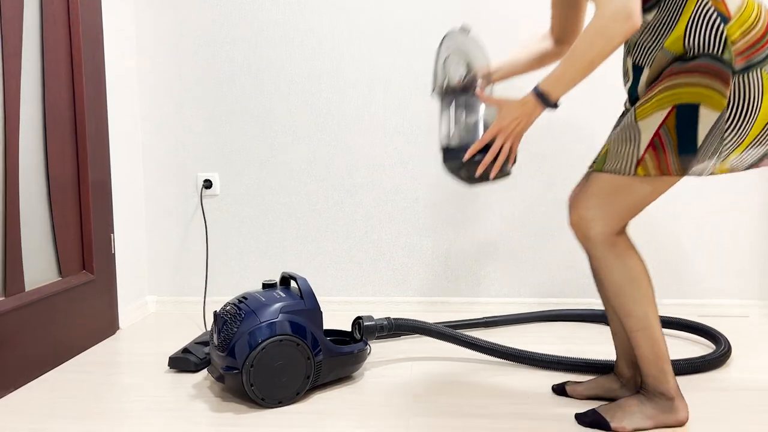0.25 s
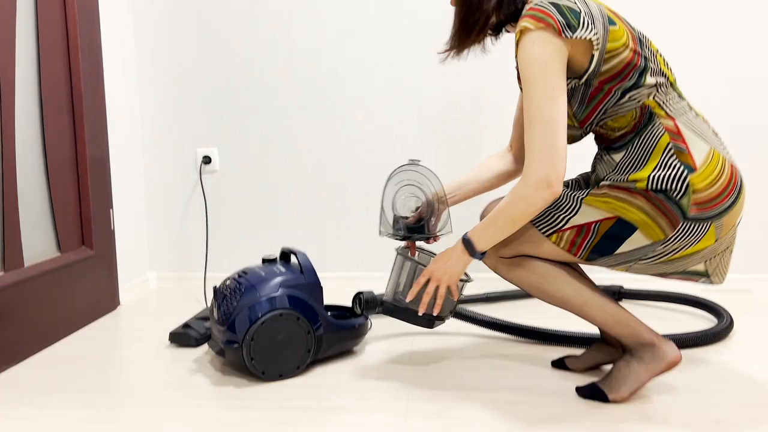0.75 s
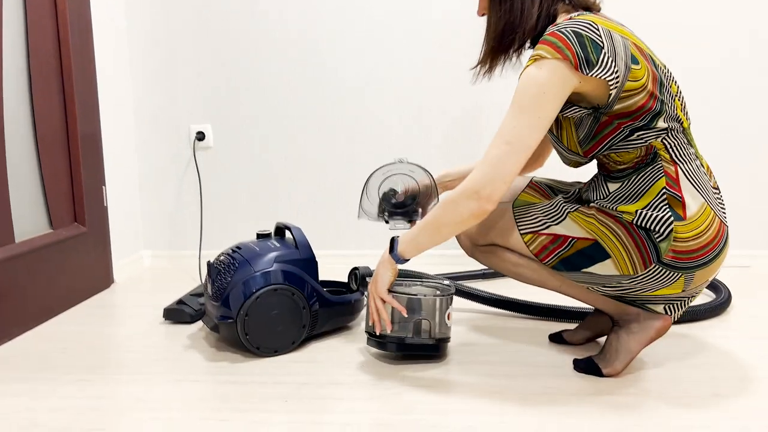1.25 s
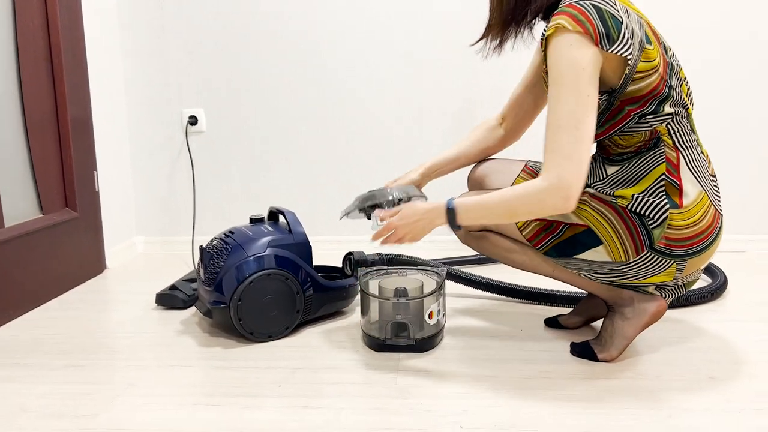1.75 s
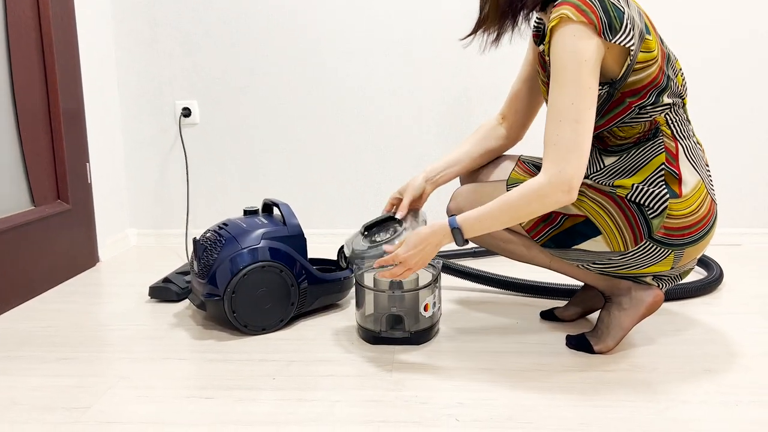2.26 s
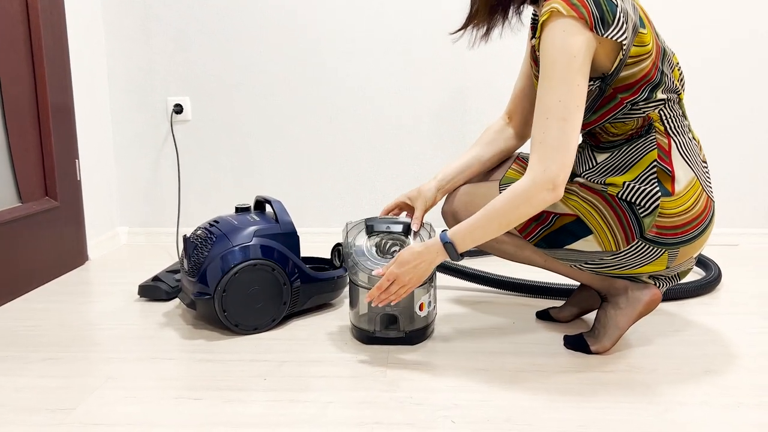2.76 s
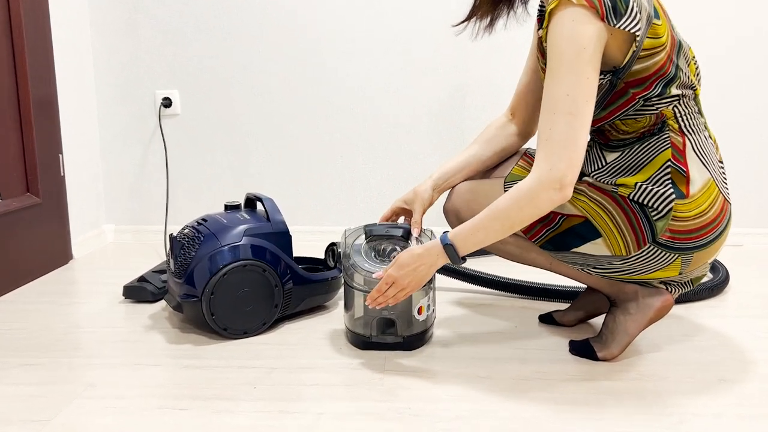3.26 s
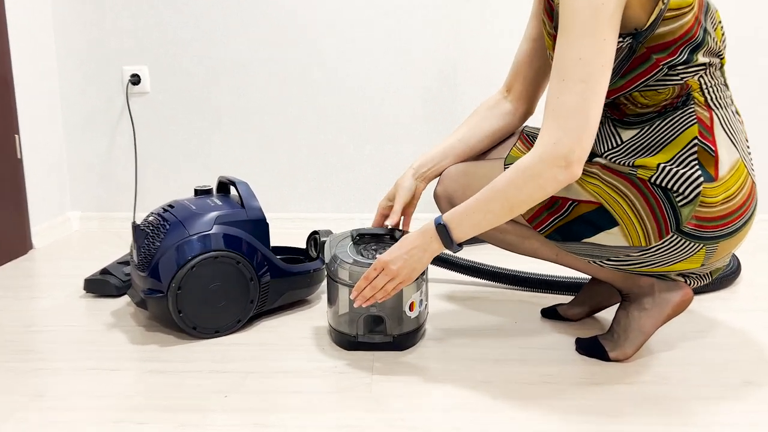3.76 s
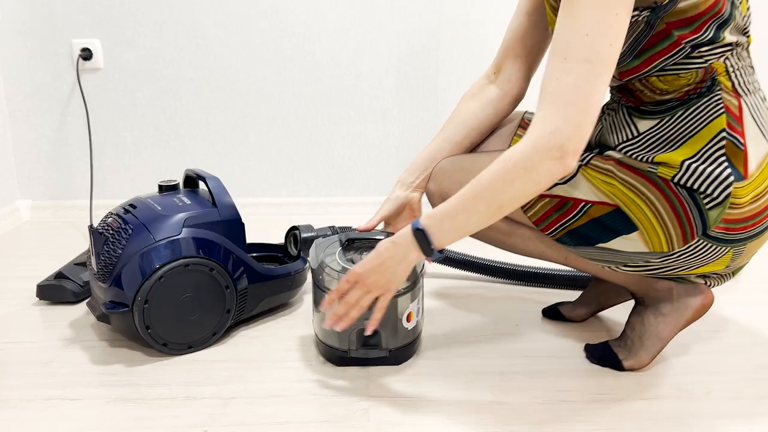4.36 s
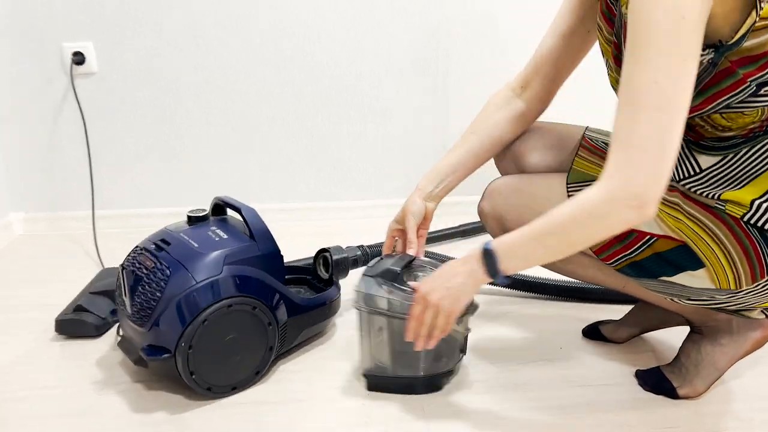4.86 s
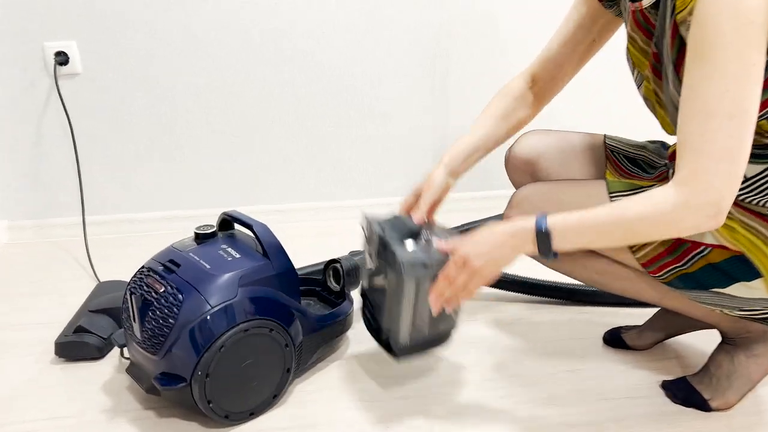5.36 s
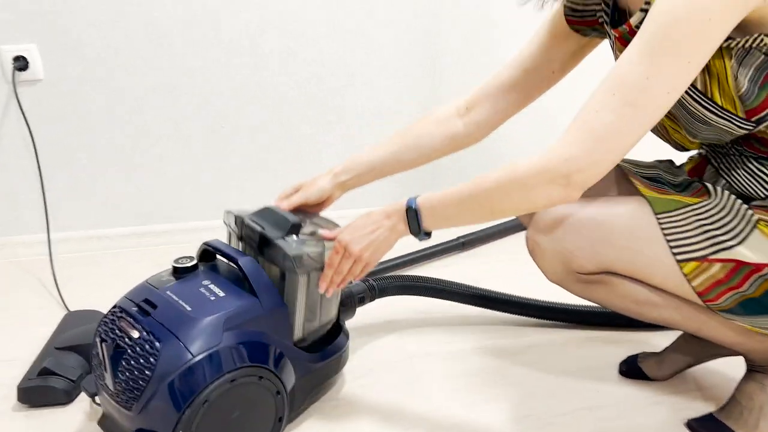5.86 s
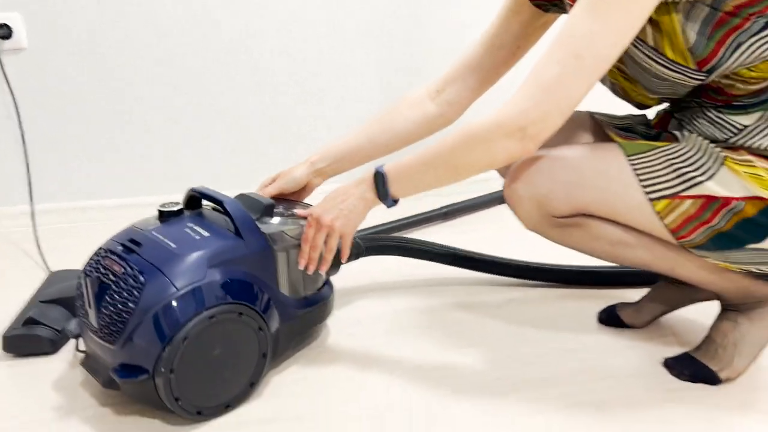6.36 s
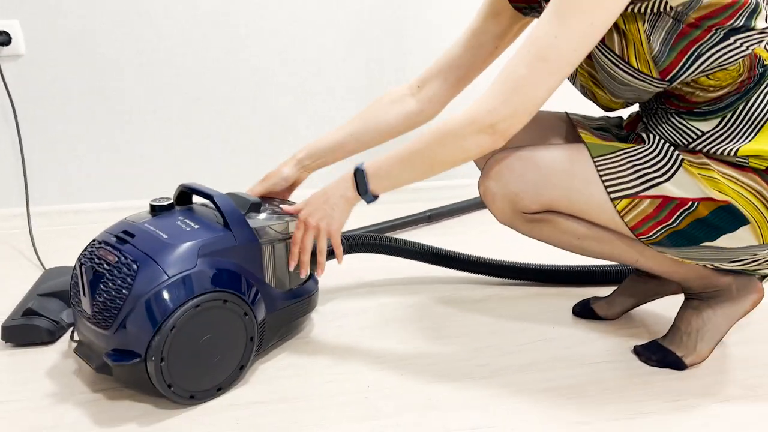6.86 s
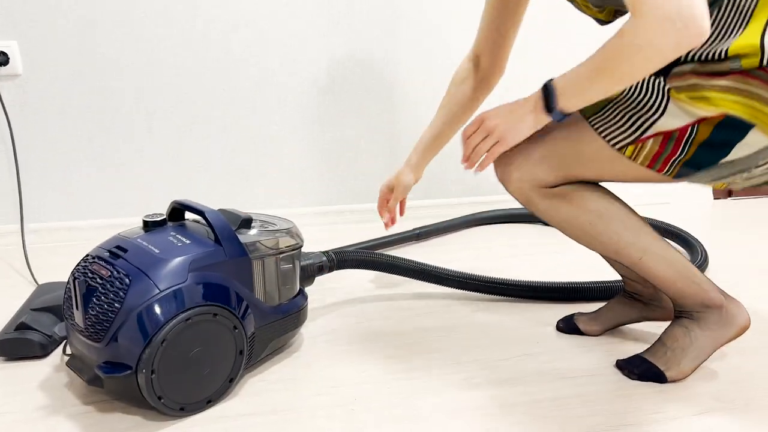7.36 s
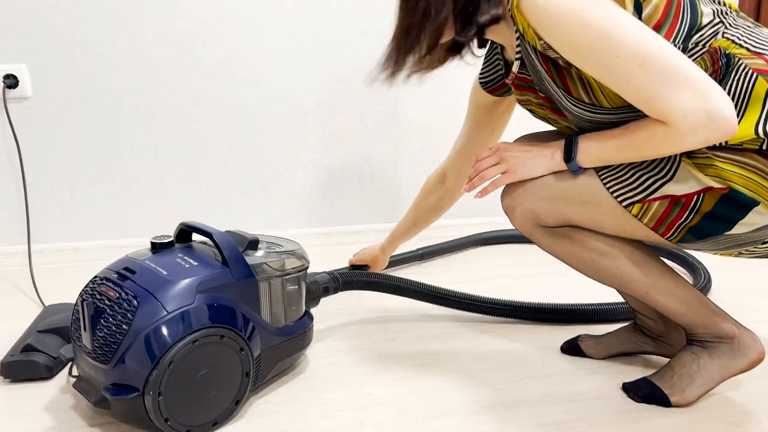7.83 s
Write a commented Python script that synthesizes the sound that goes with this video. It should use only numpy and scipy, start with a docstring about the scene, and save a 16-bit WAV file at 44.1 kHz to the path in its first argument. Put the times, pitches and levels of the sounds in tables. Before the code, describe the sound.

A plastic vacuum dust bin clacks, lands, and is clunked shut, then bumps and snaps into its housing in a bare, echoing room.

```python
"""Dull taps and a rustle of hands open the scene: a plastic dust bin is handled in a bare, quiet room.
Filter and lid clack and click into place, the bin lands on a laminate floor, and the lid is scraped and shut.
The bin rocks, bumps and slides into the vacuum cleaner and latches; the ribbed hose is picked up and dragged.
Contacts are short forces that ring plastic modes over a damped thud; rubbing is a coloured stream of tiny slips.
Both are heard straight and through the echoes of the room, over still air."""
import sys
import numpy as np
from scipy import signal
from scipy.fft import rfft, irfft, next_fast_len
from scipy.io import wavfile

SR = 44100
rng = np.random.default_rng(int(sys.argv[2]) if len(sys.argv) > 2 else 0)


def put_to_file(sound):
    """Save the sound as 16-bit audio at rate SR, in the file named by the first command-line argument."""
    columns = np.atleast_2d(sound).T  # one column per channel
    safe = np.clip(columns, -1, 1)
    whole_steps = np.round(safe * 32767)
    wavfile.write(sys.argv[1], SR, whole_steps.astype(np.int16))


N = 356945
TIME = np.arange(N) / SR   # seconds

# Wall modes of the bin. Each row: frequency in Hz, level in dB over the bare contact before ring_db, t60 in s.
BIN_WALL_MODES = [(564, 2, .08), (710, -2.5, .08), (908, 4, 0.074), (1106, 3.5, 0.049), (1506, 15, 0.053),
                  (1627, 15, 0.078), (1728, 13, 0.019), (1878, 5.5, 0.037), (2080, -1.5, 0.24),
                  (2437, 0, .06), (2758, 10.5, 0.17), (3240, 1, 0.011), (4020, 2.5, 0.035),
                  (4930, -3.5, 0.069), (6600, 7.5, 0.026)]
# Modes of the housing with the bin in it. Each row: frequency in Hz, level in dB as above, t60 in seconds.
HOUSING_MODES = [(548, 7, 0.036), (800, 7.4, 0.011), (1128, 3.2, 0.11), (1530, 6.2, 0.14),
                 (1700, 13, 0.058), (1862, 10, 0.039), (2498, 2.4, 0.044), (3460, 4.8, .03),
                 (3984, 4, 0.024), (4865, 3.5, 0.075), (6830, 5.8, 0.027)]
# How the microphone pair leans. Each row: frequency in Hz, left minus right in dB.
STEREO_LEAN = [(80, -2), (130, -4.5), (200, -1.5), (350, 2), (700, 5.5), (1100, 2), (1500, 0), (2500, 3),
               (4500, 4), (8000, -1), (15000, 0)]


def from_db(db):
    """Gain for a level in dB."""
    return 10 ** (np.asarray(db) / 20)


def at_hz(points, hz):
    """Read a table of (Hz, value) on a log-frequency axis."""
    f, value = np.transpose(points)
    return np.interp(np.log(np.maximum(hz, 1)), np.log(f), value)


def pan(db):
    """Left and right gains of constant power; positive dB leans left."""
    g = from_db(np.array([[1], [-1]]) * db / 2)
    return g / np.sqrt(np.mean(g ** 2, axis=0))


def add(track, s, sound):
    """Mix a sound in at a time in seconds."""
    start = max(0, round(s * SR))
    track[..., start:start + sound.shape[-1]] += sound[..., :N - start]


def at_level(x, db):
    """Give a short sound the energy of 50 ms at this level."""
    energy = np.sum(x ** 2, axis=-1, keepdims=True)
    return x * from_db(db) * np.sqrt(SR / 20 / energy)


def band_pass(edges, order):
    """Sections of a causal band-pass."""
    return signal.butter(order, edges, "band", fs=SR, output="sos")


def resonate(x, hz, t60):
    """One damped resonance with a gain of about 1 at its peak."""
    r = 1000 ** (-1 / (t60 * SR))   # decay per sample
    b = np.array([1, 0, -1]) * (1 - r * r) / 2
    a = [1, -2 * r * np.cos(2 * np.pi * hz / SR), r * r]
    return signal.lfilter(b, a, x + 1e-18)   # the tiny offset avoids slow denormal numbers


def coloured(x, colour):
    """Give noise a spectrum in dB per Hz; rms 1."""
    size = next_fast_len(N)
    gain = from_db(at_hz(colour, np.fft.rfftfreq(size, 1 / SR)))
    y = irfft(rfft(x, size) * gain, size)[..., :N]
    return y / np.sqrt(np.mean(y ** 2))


def diffuse_spectrum(size):
    """Spectrum of white noise from all sides as the two microphones pick it up."""
    # Each row: frequency in Hz, left-right likeness (clipped to -1..1 after interpolation).
    stereo_likeness = [(80, 0.069), (300, .88), (480, 0.058), (700, 0.059), (1400, 0.17), (2300, .7),
                       (4800, 0.11), (7500, 0.88), (9300, -1.1), (10500, -2), (11500, 1), (15000, 0.8)]
    hz = np.fft.rfftfreq(size, 1 / SR)
    mid, side = rfft(rng.standard_normal((2, size)))
    alike = np.clip(at_hz(stereo_likeness, hz), -1, 1)
    pair = np.sqrt((1 + alike) / 2) * mid + np.sqrt((1 - alike) / 2) * side * [[1], [-1]]
    return pair * pan(at_hz(STEREO_LEAN, hz))


def diffuse_noise(size):
    """White noise from all sides as a stereo sound."""
    return irfft(diffuse_spectrum(size), size)


def near_path(x, bounce_db=-6, bounce_s=0.0039):
    """Straight sound with the lean of the pair, and quick bounces off floor and wall."""
    size, lead = 2048, 24   # samples; the lead leaves space for the lean filter to start early
    lean = irfft(pan(at_hz(STEREO_LEAN, np.fft.rfftfreq(size, 1 / SR))), size)
    dying = np.exp(-np.arange(size) / SR / bounce_s) * np.sqrt(2 / (bounce_s * SR))
    bounces = diffuse_noise(size) * dying
    path = np.roll(lean, lead, axis=1) + from_db(bounce_db) * np.roll(bounces, 2 * lead, axis=1)
    path = path[:, :size // 2] / np.sqrt(1 + from_db(bounce_db) ** 2)
    return signal.oaconvolve(x[None], path, axes=1)[:, lead:len(x) + lead]


def room_fade(size=24000, gap_s=0.0066, build_s=0.00057):
    """Bare walls: how echoes build up and die in each range, and each range's share of the spectrum."""
    # Decay of the room. Each row: centre of the range in Hz, t60 in seconds.
    room_decay = [(100, 0.53), (300, 0.4249), (800, 0.4137), (1800, 0.4539), (4500, 0.4), (8000, 0.42),
                  (14000, 0.46)]
    t, hz = TIME[:size], np.fft.rfftfreq(size, 1 / SR)
    centres, t60 = np.transpose(room_decay)
    build_up = 1 - np.exp(-np.maximum(t - gap_s, 0) / build_s)
    fade = 1000 ** (-t / t60[:, None]) * build_up
    shares = np.array([at_hz(list(zip(centres, own)), hz) for own in np.eye(len(centres))])
    return fade / np.sqrt(np.sum(fade ** 2, axis=1, keepdims=True)), shares


def echoes(magnitude, fade, shares):
    """Dense stereo echoes of a sound with this spectrum; every call draws a pattern of its own."""
    size = fade.shape[1]
    noise = (diffuse_spectrum(size) * magnitude).astype(np.complex64)
    ranges = zip(shares.astype(np.float32), fade.astype(np.float32))
    return sum(irfft(noise * share, size) * dying for share, dying in ranges)


def chatter(chatter_s, size, touches_per_s=7000, first_touch=0.44, bite_s=0.00033):
    """Force of one contact: a first touch, then loose edges buzzing to rest."""
    t = TIME[:size]
    pressure = np.exp(-t / chatter_s) * (1 - np.exp(-t / bite_s))
    touches = rng.random(size) < touches_per_s / SR
    force = rng.standard_normal(size) * touches * pressure
    force[0] = first_touch
    return force


def swing(hz, swell_s, size):
    """A heavy, well damped body swings up and settles within a few cycles."""
    t = TIME[:size]
    return t * np.exp(-t / swell_s) * np.sin(2 * np.pi * hz * t)


def contacts(table, modes, registers_db, chatter_s, thud_hz, swell_s, floor_db, room_db, soft_hz, ring_db,
             lean_db, floor_hz=86, floor_swell_s=0.0068, low_room_db=-0.5, bump_db=-3, size=20480):
    """Stereo contacts: each rings the walls, thuds the hollow body and shakes the floor."""
    # Where knock, clack, snap and tick lie. Each row: low edge in Hz, high edge in Hz.
    register_edges = [(400, 1200), (1200, 2300), (2300, 5200), (5200, 15500)]
    # Low standing waves. Each row: frequency in Hz, level in dB over thud and boom, t60 in seconds,
    # left minus right in dB before lean_db.
    standing_waves = [(92, 5, 0.34, 1), (118, 6.5, 0.15, -2.5), (165.2, 5.5, 0.24, 11.5),
                      (216.6, 0.5, 0.2, 9), (334, 3.5, .35, 9)]
    direct, lows, tails = np.zeros(N), np.zeros(N), np.zeros((2, N))
    fade, shares = room_fade(size)
    give = np.exp(-2 * np.pi * soft_hz / SR)   # plastic yields, which rounds off the force
    short = size // 4
    octaves = np.log2(register_edges).mean(axis=1)
    registers = [band_pass(edges, order=4) for edges in register_edges]
    blow = band_pass([115, 430], order=3)
    for s, clatter_db, brightness_db, thud_db, direct_db in table:
        # the direct sound carries the chatter, the room only the colour of a plain knock
        pushes = [chatter(chatter_s, short), signal.unit_impulse(short) + 1e-18]
        force = signal.lfilter([1], [1, -give], pushes)
        ringing = sum(from_db(db + ring_db) * resonate(force, hz, t60) for hz, db, t60 in modes)
        walls = force + ringing
        # the parts that meet set the weight of each register; brightness tilts it around the clack
        weights_db = clatter_db + np.array(registers_db) + brightness_db * (octaves - octaves[1])
        layers = [at_level(signal.sosfilt(sos, walls), db) for sos, db in zip(registers, weights_db)]
        clatter, knock = sum(layers)
        thud = at_level(swing(thud_hz, swell_s, short), thud_db)
        boom = at_level(swing(floor_hz, floor_swell_s, short), thud_db + floor_db)
        # the blow itself is broader than the swing
        bump = at_level(signal.sosfilt(blow, force[1]), thud_db + bump_db)
        room_parts = (knock, bump, from_db(low_room_db) * (thud + boom))
        power = sum(np.abs(rfft(part, size)) ** 2 for part in room_parts)
        room_share = 1 / np.sqrt(1 + from_db(direct_db) ** 2)
        add(direct, s, (clatter + thud + boom + bump) * room_share * from_db(direct_db))
        add(tails, s, echoes(np.sqrt(power), fade, shares) * room_share * from_db(room_db))
        add(lows, s, thud + boom)
    first_s, last_s = table[0][0], table[-1][0]
    sounding = slice(max(0, round(first_s * SR)), round(last_s * SR) + SR)
    standing = sum(pan(pan_db) * from_db(db) * resonate(lows[sounding], hz, t60)
                   for hz, db, t60, pan_db in standing_waves)
    add(tails, first_s, near_path(direct[sounding]) + standing)
    return tails * pan(lean_db)


def strokes(rows, rise_db_per_s, fall_db_per_s, rest_db=-120):
    """Gain of a rubbing movement: each stroke swells, holds and dies away to the level at rest."""
    t = TIME[::32]   # a coarse grid is enough for a slow gain
    levels = [rest_db + 0 * t]
    for s, hold_s, db in rows:
        rise = rise_db_per_s * np.maximum(s - t, 0)
        fall = fall_db_per_s * np.maximum(t - s - hold_s, 0)
        levels.append(db - rise - fall)
    return np.interp(TIME, t, from_db(np.max(levels, axis=0)))


def friction(gain, colour, slips_per_s, uneven_db):
    """Rubbing is a stream of tiny slips of uneven size."""
    happens = rng.random(N) < slips_per_s / SR
    direction = rng.choice([-1, 1], N)
    strength = from_db(uneven_db * np.clip(rng.standard_normal(N), -2, 2))
    return coloured(happens * direction * strength, colour) * gain


def still_air():
    """The quiet room: steady diffuse noise with a fixed spectrum."""
    # Each row: frequency in Hz, level in dB per Hz (relative).
    air_colour = [(25, 4), (77, 6.5), (200, -2), (330, 3), (620, -4), (1100, 5.5), (2000, -9.5),
                  (4000, -23), (8000, -25.5), (15000, -29)]
    return from_db(-68) * coloured(diffuse_noise(next_fast_len(N)), air_colour)


def rustle():
    """Hands and clothes: dense slips swell with each movement over a faint rest level."""
    # Each row: start in seconds, hold in seconds, level in dB before the mix.
    movements = [(0.0, 0.013, -58), (0.34, 0.3, -65.5), (0.55, 0.12, -63.5), (0.78, 0.41, -73),
                 (1.93, 0.0092, -65.5), (2.15, 0.051, -61.5), (2.35, 0.13, -64.5), (3.87, 0.59, -58.5),
                 (4.88, 0.076, -55), (5.2, 0.086, -59.5), (5.49, 0.0067, -62.5), (5.75, 0.0067, -54.5),
                 (6.83, 0.016, -65), (7.1, 0.12, -72), (7.53, 0.047, -71.5), (7.95, 0.14, -59)]
    # Each row: frequency in Hz, level in dB per Hz (relative).
    rustle_colour = [(60, -7.5), (300, 1), (800, 0), (1800, -1.5), (4500, -7), (8500, -17.5), (13000, -16),
                     (15500, -11)]
    gain = strokes(movements, rise_db_per_s=202.5, fall_db_per_s=111.5, rest_db=-79)
    return friction(gain, rustle_colour, slips_per_s=3600, uneven_db=4.0)


def dull_taps():
    """Fingers and loose parts tap the bin, with little treble and a short thud."""
    # Each row: start in seconds, clatter in dB before registers_db, brightness in dB per octave,
    # thud in dB, direct over room in dB before room_db.
    tap_rows = [(0.003, -47.5, -3, -50.5, -5), (0.1, -55, -2, -58, -18), (0.164, -51.5, 6, -64, -16),
                (0.405, -57.5, 1.5, -76, -1), (0.804, -59, 2, -97, -15), (2.708, -50.5, -0.5, -53, -5.5),
                (2.992, -57.5, -1.5, -67, -13), (3.022, -71, -7, -60.5, -3),
                (3.185, -59.5, -1.5, -60, -6.5), (3.211, -52.5, -1.5, -59, -2.5),
                (3.58, -42, -1, -58, -5.5), (3.688, -36, -1, -47, -8.5), (3.995, -49.5, 1, -60.5, -9)]
    return contacts(tap_rows, BIN_WALL_MODES, registers_db=[-4.5, -8.4, -15.4, -30.5], ring_db=-4,
                    chatter_s=0.0046, thud_hz=341, swell_s=0.0031, bump_db=-3.5, floor_db=-9.5,
                    room_db=1, low_room_db=-1.5, soft_hz=1800, lean_db=1)


def tab_clicks():
    """The lid's tabs click thinly, the snap register strong against the clack."""
    # Each row: start in seconds, clatter in dB before registers_db, brightness in dB per octave,
    # thud in dB, direct over room in dB before room_db.
    click_rows = [(0.261, -68.5, 6.5, -72, 1), (0.867, -76, 6, -85.5, 0), (1.28, -36, 2.3, -43.5, -9),
                  (2.033, -51, 3.5, -66, -8), (2.1, -55.5, 3, -71, -2), (2.203, -57.5, 2, -89, 2),
                  (2.369, -60.5, 6, -81, 2.5), (2.541, -51.5, 5.5, -69, -2)]
    return contacts(click_rows, BIN_WALL_MODES, registers_db=[-4.5, -8.5, -6, -15.0], ring_db=-6.5,
                    chatter_s=0.003, thud_hz=332, swell_s=0.0035, floor_db=-12.5,
                    room_db=1.5, soft_hz=1800, lean_db=0.5)


def rim_clacks():
    """Filter and lid clack hard on the rim and ring the bin walls."""
    # Each row: start in seconds, clatter in dB before registers_db, brightness in dB per octave,
    # thud in dB, direct over room in dB before room_db.
    clack_rows = [(1.043, -46, 3.5, -58.5, -10.5), (1.132, -29, -0.5, -48.5, 0),
                  (3.736, -45.5, 3.5, -57, -1), (3.846, -44.5, 0, -56, -1.5), (5.262, -58.5, 3, -64.5, 6)]
    return contacts(clack_rows, BIN_WALL_MODES, registers_db=[-6.0, -5.0, -5.0, -21.5], ring_db=-1.5,
                    chatter_s=0.0031, thud_hz=240, swell_s=0.004, floor_db=-1.0,
                    room_db=1, soft_hz=1800, lean_db=1)


def weight_shifts():
    """Weight shifts on the floor boards: sparse, uneven slips with a deep spectrum."""
    # Each row: start in seconds, hold in seconds, level in dB before the mix.
    shift_rows = [(1.12, 0.52, -49.5), (4.1, 0.41, -66), (4.79, 0.036, -44), (6.13, 0.04, -55),
                  (6.59, 0.02, -57.5)]
    # Each row: frequency in Hz, level in dB per Hz (relative).
    board_colour = [(10, -26), (25, -12), (42, -9.5), (62, -4), (90, -9.5), (200, -23), (1000, -65),
                    (8000, -91)]
    gain = strokes(shift_rows, rise_db_per_s=191, fall_db_per_s=60, rest_db=-79.5)
    return friction(gain, board_colour, slips_per_s=290, uneven_db=7.5)


def base_landings():
    """The open bin lands softly on the floor, its walls ringing little."""
    # Each row: start in seconds, clatter in dB before registers_db, brightness in dB per octave,
    # thud in dB, direct over room in dB before room_db.
    landing_rows = [(1.491, -36.5, 0.5, -40, -2.5), (1.546, -48.5, -7.5, -46, -4), (1.602, -57, 4, -38, -3),
                    (1.715, -60, -1, -56.5, -6)]
    return contacts(landing_rows, BIN_WALL_MODES, registers_db=[-4.5, -19.5, -16.5, -30.5], ring_db=-13,
                    chatter_s=0.0021, thud_hz=290, swell_s=0.0016, floor_db=-2,
                    room_db=-1, soft_hz=1800, lean_db=1.0)


def lid_scrape():
    """The lid's edge sticks and slips on the rim while it is lined up."""
    # Each row: start in seconds, hold in seconds, level in dB before the mix.
    scrape_rows = [(2.05, 0.19, -60.5), (2.56, 0.14, -68)]
    # Each row: frequency in Hz, level in dB per Hz (relative).
    scrape_colour = [(300, -20.5), (570, 11), (900, -13), (1900, 4.5), (3200, -6.5), (4200, -7), (5100, 1),
                     (6200, -19), (15000, -34.5)]
    gain = strokes(scrape_rows, rise_db_per_s=600, fall_db_per_s=198)
    return friction(gain, scrape_colour, slips_per_s=1400, uneven_db=6.5)


def lid_shut():
    """The lid is pressed shut with one heavy clunk."""
    # Each row: start in seconds, clatter in dB before registers_db, brightness in dB per octave,
    # thud in dB, direct over room in dB before room_db.
    shut_rows = [(4.045, -22.5, 0, -23, 3)]
    return contacts(shut_rows, BIN_WALL_MODES, registers_db=[-7.5, -5.5, -14.0, -24.0], ring_db=0.5,
                    chatter_s=0.0049, thud_hz=215, swell_s=0.0057, bump_db=-1, floor_db=-15,
                    room_db=3.5, low_room_db=-1.5, soft_hz=1800, lean_db=1.0)


def base_rocks():
    """The closed bin rocks on its base with a deeper thud and a rattle of the lid."""
    # Each row: start in seconds, clatter in dB before registers_db, brightness in dB per octave,
    # thud in dB, direct over room in dB before room_db.
    rock_rows = [(4.352, -36, 1, -45.5, -13.5), (4.376, -40, -4.5, -31.5, 4.5), (4.589, -41, 0, -47, -4),
                 (4.599, -32.5, 1, -48.5, 1), (4.755, -55.5, 8, -46.5, -6), (4.79, -35, 1, -36, 0.5),
                 (4.986, -38.5, -0.5, -37, -2), (5.055, -36.5, 1, -43, -1.5),
                 (5.137, -41.5, 0.5, -43.5, 1.5)]
    return contacts(rock_rows, BIN_WALL_MODES, registers_db=[-15.0, -7, -20.0, -32.5], ring_db=-4,
                    chatter_s=0.0042, thud_hz=189, swell_s=0.0029, bump_db=-2.5, floor_db=-8.5,
                    room_db=1.5, low_room_db=-3.5, soft_hz=1800, lean_db=1.0)


def seat_bumps():
    """The bin bumps into its seat and rings the housing over a long-swelling thud."""
    # Each row: start in seconds, clatter in dB before registers_db, brightness in dB per octave,
    # thud in dB, direct over room in dB before room_db.
    bump_rows = [(5.832, -31.5, 2.15, -31.5, -1), (5.978, -35, 2, -52, -3), (6.004, -32, -1, -52.5, -3.5),
                 (6.024, -34, 1, -37, -1), (6.047, -36.5, -1.5, -50, -20), (6.11, -36, -2.5, -46, 0),
                 (6.137, -41, 1.5, -38.5, -11), (6.186, -38.5, -2, -32.5, 3), (6.877, -52.5, 2, -53, -5.5)]
    return contacts(bump_rows, HOUSING_MODES, registers_db=[-1.4, -10.5, -17.0, -24.5], ring_db=-4.5,
                    chatter_s=0.0023, thud_hz=217.1, swell_s=0.011, bump_db=-1, floor_db=-12.5,
                    room_db=-0.7, low_room_db=-4, soft_hz=2500, lean_db=1.5)


def bin_slide():
    """The bin slides down into its seat, then the last bit to the latch, in sparse slips."""
    # Each row: start in seconds, hold in seconds, level in dB before the mix.
    slide_rows = [(6.0, 0.17, -45.5), (6.57, 0.0087, -41.5)]
    # Each row: frequency in Hz, level in dB per Hz (relative).
    slide_colour = [(50, -27), (100, -8.5), (220, 14.5), (330, 3), (800, -1.5), (1400, -9), (3000, -23.5),
                    (7000, -36), (15000, -43)]
    gain = strokes(slide_rows, rise_db_per_s=748, fall_db_per_s=705)
    return friction(gain, slide_colour, slips_per_s=320, uneven_db=6.0)


def latch_snap():
    """The latch trips, snaps home and rebounds, with long chatter and a short thud."""
    # Each row: start in seconds, clatter in dB before registers_db, brightness in dB per octave,
    # thud in dB, direct over room in dB before room_db.
    latch_rows = [(6.573, -32, 0.5, -44, -11), (6.582, -24.5, -0.5, -31.5, 4), (6.607, -31, -2.5, -59, 0)]
    return contacts(latch_rows, HOUSING_MODES, registers_db=[-5, -1.4, -5.5, -12], ring_db=-0.5,
                    chatter_s=0.008, thud_hz=218, swell_s=0.0017, floor_db=-6.5,
                    room_db=0.9, soft_hz=2500, lean_db=1.0)


def hose_knocks():
    """Hose and wand knock as they are picked up, ringing very briefly."""
    # Each row: start in seconds, clatter in dB before registers_db, brightness in dB per octave,
    # thud in dB, direct over room in dB before room_db.
    knock_rows = [(7.756, -54.5, 7, -69.5, -10), (7.81, -40, 1, -62, -6), (7.893, -43, -5, -57.5, -6),
                  (7.944, -50.5, -1, -50, -14), (7.989, -41, -2, -53.5, 0)]
    # Each row: frequency in Hz, level in dB over the bare contact before ring_db, t60 in seconds.
    hose_modes = [(795, 11, 0.022), (1990, 1.7, 0.021), (3660, 19, 0.0041), (4400, 7.1, 0.0068)]
    return contacts(knock_rows, hose_modes, registers_db=[-11, -7.5, -4, -11.5], ring_db=6,
                    chatter_s=0.0051, thud_hz=305, swell_s=0.0026, floor_db=2,
                    room_db=1.0, soft_hz=2500, lean_db=1.0)


def hose_drag():
    """Pulls on the ribbed hose: sparse slips that rise fast and die more slowly."""
    # Each row: start in seconds, hold in seconds, level in dB before the mix.
    pull_rows = [(7.785, 0.21, -49.5), (7.97, 0.066, -41)]
    # Each row: frequency in Hz, level in dB per Hz (relative).
    drag_colour = [(30, -11.5), (90, 2.5), (250, -1), (800, 1.5), (1400, -7.5), (3000, -13.5), (7000, -34),
                   (15000, -37.5)]
    gain = strokes(pull_rows, rise_db_per_s=800, fall_db_per_s=148)
    return friction(gain, drag_colour, slips_per_s=500, uneven_db=5.5)


def scene():
    """Contacts and rubbing, heard straight and through the room, over still air."""
    handling = dull_taps() + tab_clicks() + rim_clacks() + base_landings() + lid_shut() + base_rocks()
    docking = seat_bumps() + latch_snap() + hose_knocks()
    rub = rustle() + weight_shifts() + lid_scrape() + bin_slide() + hose_drag()
    rub_echoes = signal.oaconvolve(rub[None], echoes(0.8, *room_fade()), axes=1)[:, :N]
    rubbing = near_path(from_db(-2.0) * rub) + from_db(1.5) * rub_echoes
    return handling + docking + rubbing + still_air()


def record(dry, port_hz=7900, port_t60=0.0015, port_db=-5, dull_hz=13000, low_cut_hz=42, cutoff_hz=15500):
    """The microphone loses deep bass, its ports resonate faintly, and the top dulls and is cut steeply."""
    heard = dry + from_db(port_db) * resonate(dry, port_hz, port_t60)
    heard = signal.sosfilt(signal.butter(2, low_cut_hz, "high", fs=SR, output="sos"), heard)
    heard = signal.sosfilt(signal.butter(2, dull_hz, fs=SR, output="sos"), heard)
    # 0.2 dB of ripple below the cutoff, 80 dB of rejection above it
    return signal.sosfilt(signal.ellip(10, .2, 80, cutoff_hz, fs=SR, output="sos"), heard)


dry = scene()
out = record(dry)
put_to_file(out)
```